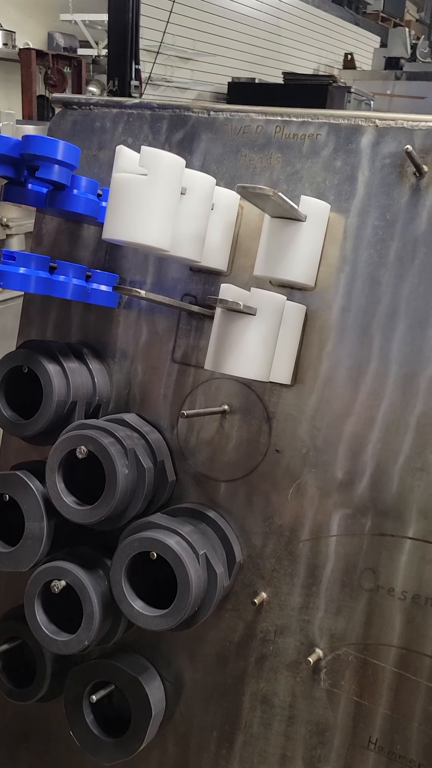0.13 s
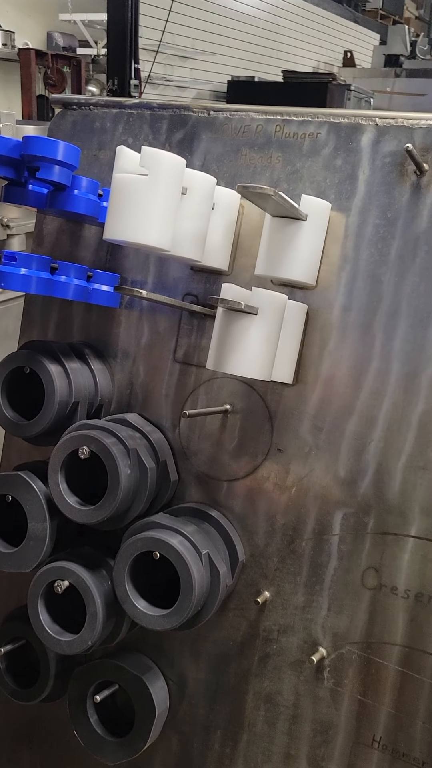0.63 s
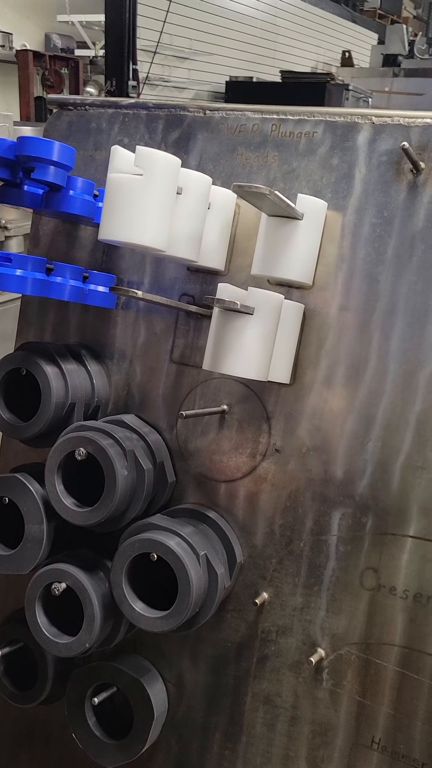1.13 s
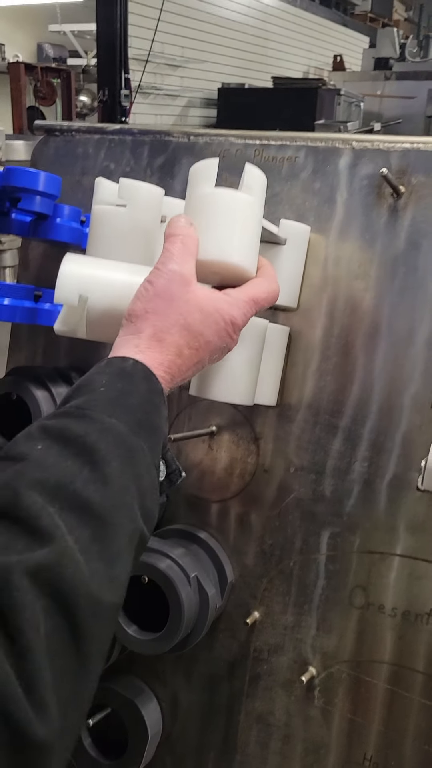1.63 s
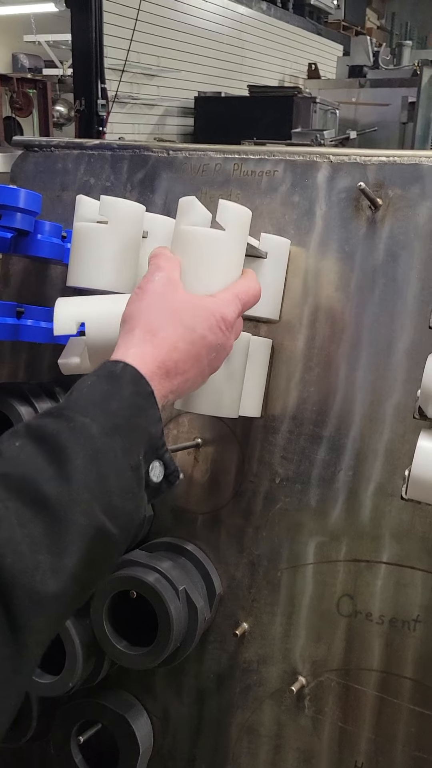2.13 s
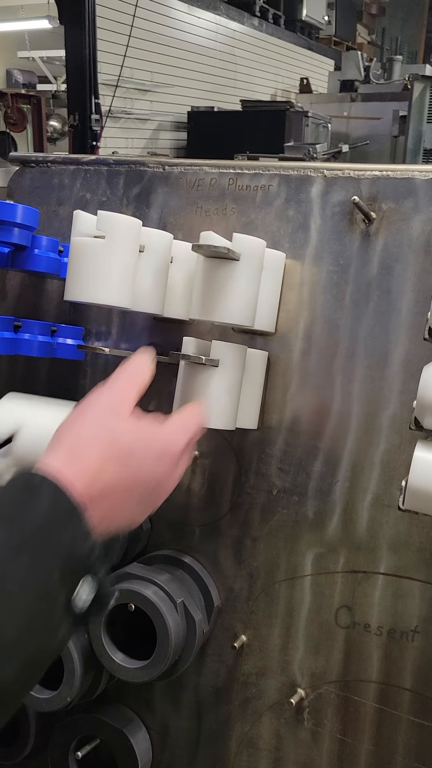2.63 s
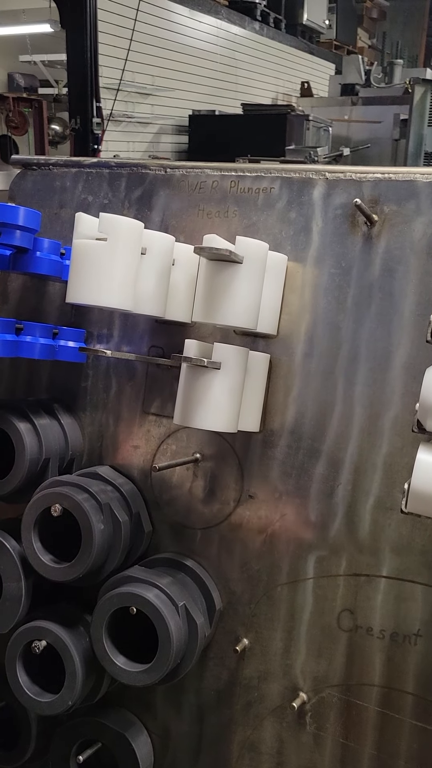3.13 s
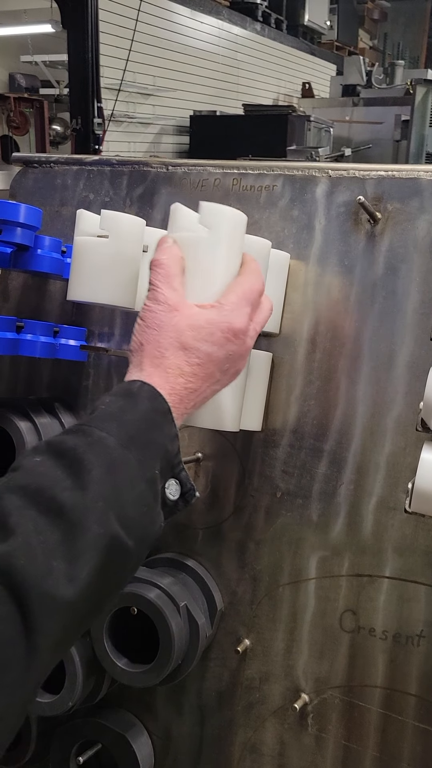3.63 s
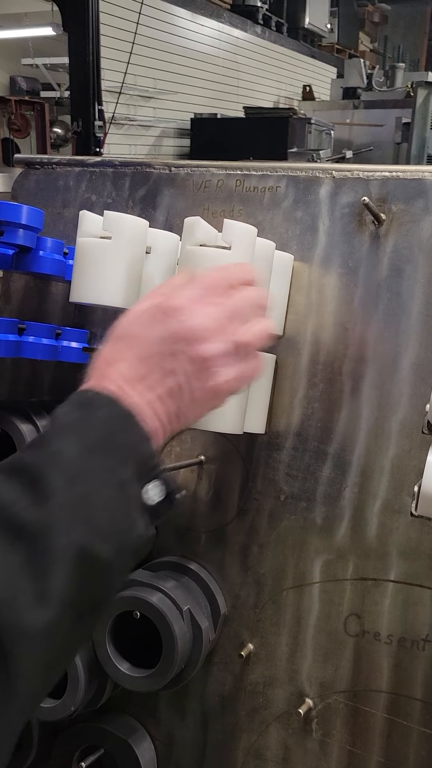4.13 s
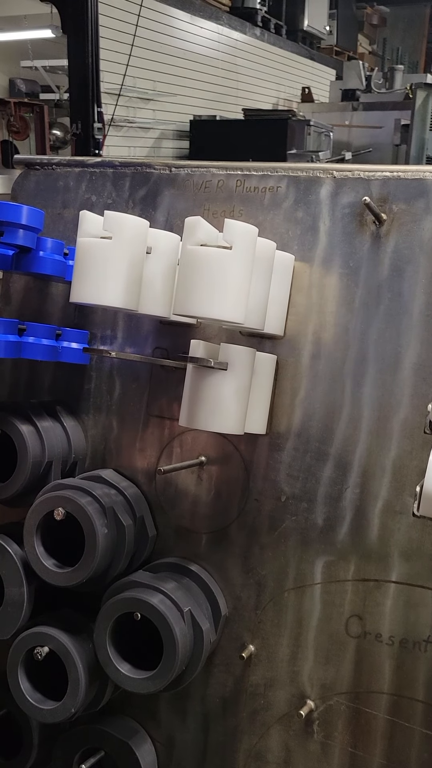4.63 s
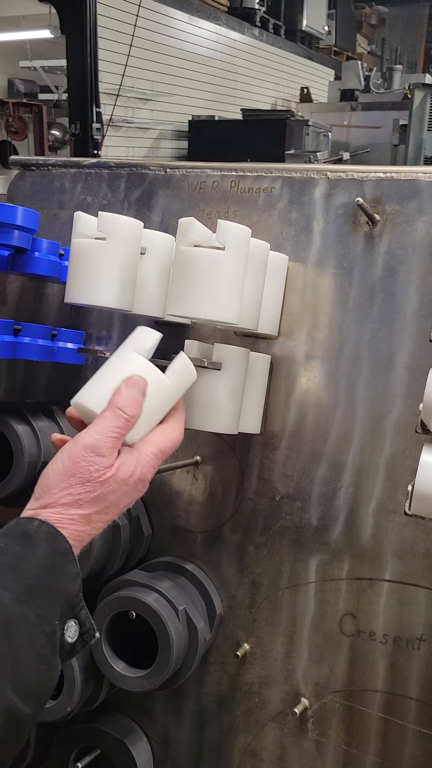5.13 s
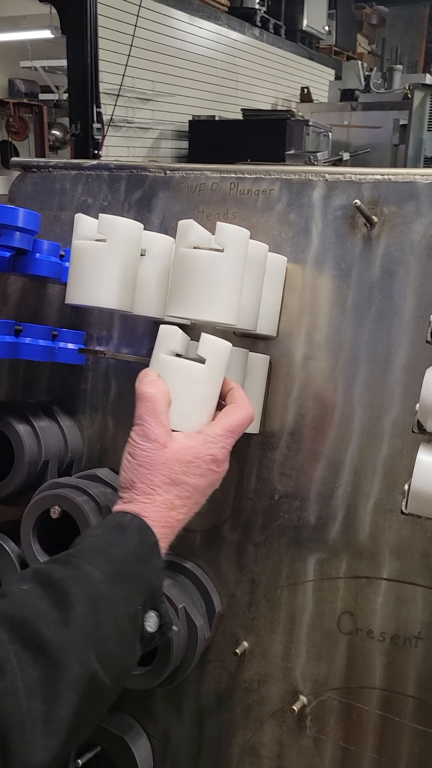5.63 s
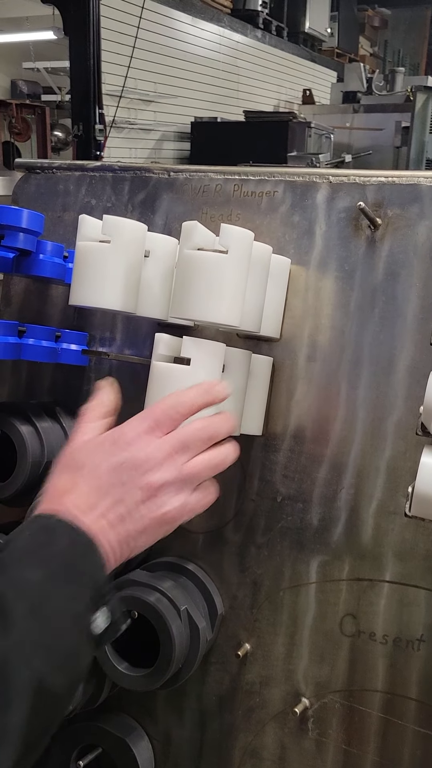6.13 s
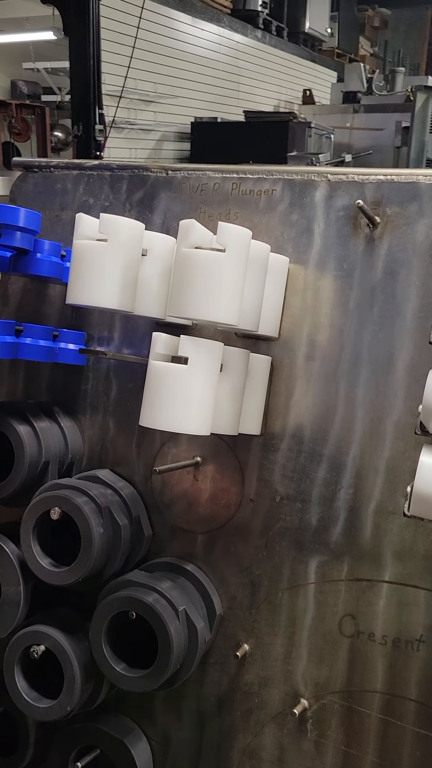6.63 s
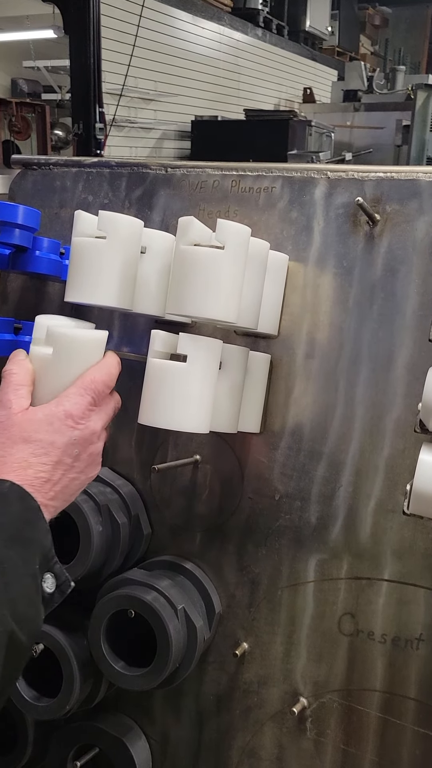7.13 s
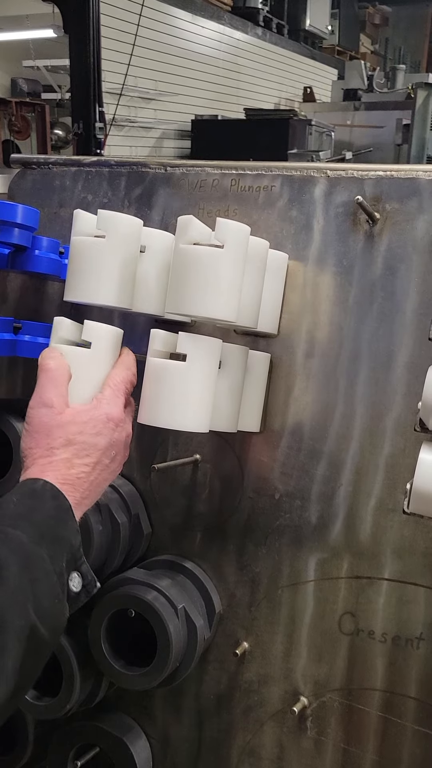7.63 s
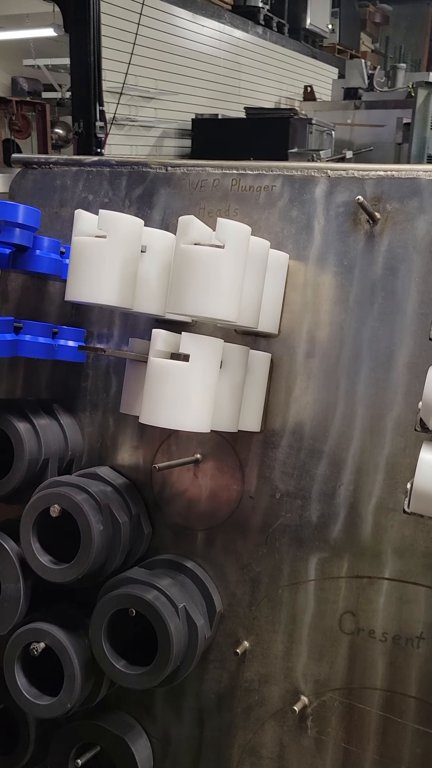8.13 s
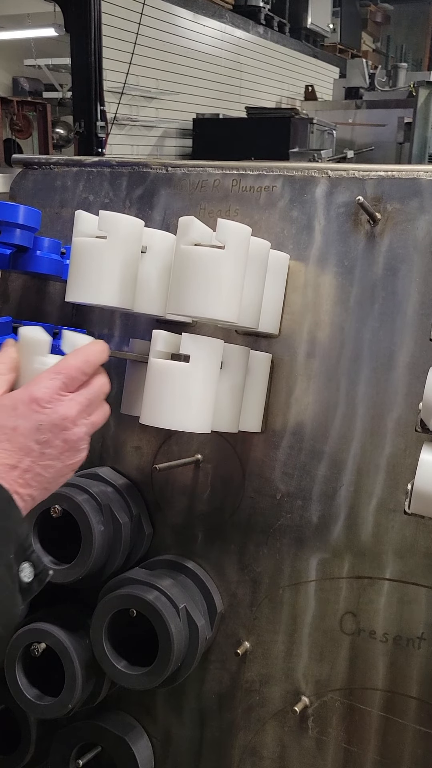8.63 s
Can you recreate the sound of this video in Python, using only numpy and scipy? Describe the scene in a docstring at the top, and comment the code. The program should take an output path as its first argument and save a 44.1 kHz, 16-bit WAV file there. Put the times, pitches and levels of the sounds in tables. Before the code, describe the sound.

For the first 1.7 seconds there is only a factory hall: soft broad fan noise, low wavering hum, faint distant ticks and a tiny tap near 0.5. At 1.7 a hard plastic part knocks the steel top with a quick double thud; small rattles and a light slide follow from 2.0 to 2.5, then a loud bright clack at 2.7 with a short ring. Quiet until 3.7, when another part knocks, scrapes and clatters through 4.1, ending in a strong clack with ringing steel. A lull follows. From 5.55 come several duller knocks, a gritty rub at 5.8 and a firm, lower clack at 6.0. After another pause, a sharp knock at 7.2, then bumps and sliding from 7.35 to 7.9, and the loudest booming clack at 8.0. A faint rub at 8.4, then hum. Close, stereo, short hall tail.

```python
"""First one hears fan noise, mains hum and faint far ticks in a factory hall, by two microphones 0.27 m apart.
Then hard plastic parts are set down on a cart's sheet-steel top, knocking the steel and each other.
Each blow clacks in the part (dying sines rung by contact clicks), booms in the sheet and dies away in the hall
(fading noise); between blows parts slide and rub (shaped noise), and some blows leave steel ringing.
Fans and far machines are slowly drifting noise; the hum is wavering sines."""
import sys
import numpy as np
from scipy import signal
from scipy.fft import rfft, irfft
from scipy.io import wavfile
from scipy.ndimage import uniform_filter1d

SR = 44100
rng = np.random.default_rng(int(sys.argv[2]) if len(sys.argv) > 2 else 0)


def to_linear_factor(level_db):
    """Convert decibel levels (scalar or array-like) to linear amplitude factors."""
    exponent = np.asarray(level_db, float) / 20
    return 10 ** exponent


def bounce(signal):
    """Save signal as a 16-bit WAV file at the path given by the first command-line argument."""
    frames = np.transpose(np.atleast_2d(signal))
    limited = np.clip(frames, -1, 1)
    pcm = np.round(limited * 32767).astype(np.int16)
    wavfile.write(sys.argv[1], SR, pcm)


N = 385875  # samples: 8.75 s


def evened(x):
    """Scales to rms 1."""
    return x / np.sqrt(np.mean(x ** 2) + 1e-20)


def read(points, hz, column=1):
    """Reads a table on a log-frequency axis."""
    table = np.transpose(points)
    return np.interp(np.log(hz + 1), np.log(table[0] + 1), table[column])


def add(mix, s, sound):
    """Mixes a stereo sound in at time s."""
    part = mix[:, round(s * SR):][:, :sound.shape[1]]
    part += sound[:, :part.shape[1]]


def bands(x, edges_hz):
    """Splits causally into bands at the given edges."""
    cuts = [(edges_hz[0], "low")]
    cuts += [(pair, "band") for pair in zip(edges_hz, edges_hz[1:])]
    cuts += [(edges_hz[-1], "high")]
    return [signal.sosfilt(signal.butter(3, hz, kind, fs=SR, output="sos"), x) for hz, kind in cuts]


SPACING_M = 0.27  # between the two microphones
BASS_SAME = 0.97  # likeness of the two microphones in the bass, 0-1


def diffuse(count, spectrum, colour=np.ones_like):
    """Noise from all sides, rms 1: two spaced microphones agree in the bass only."""
    hz = np.fft.rfftfreq(count, 1 / SR)
    a, b = rfft(rng.standard_normal((2, count)))
    same = np.clip(BASS_SAME * np.sinc(2 * hz * SPACING_M / 343), -1, 1)  # 343 m/s: speed of sound
    pair = np.array([a, same * a + np.sqrt(1 - same ** 2) * b])
    return evened(irfft(pair * to_linear_factor(read(spectrum, hz)) * colour(hz), count))


def modes(table, t, spread_db, unlike, beat_hz=0, detune=0):
    """Dying sines of random strength and load; phase differs between microphones; close pairs beat."""
    hz, db, t60 = np.transpose(table)[:, :, None]
    size, side, pair, load = rng.standard_normal((4, len(table), 1))
    shift = unlike * side * np.minimum(hz / 600, 1.5)
    beat = 1 + 0.63 * np.sin(2 * np.pi * beat_hz * (1 + pair / 2) * t)
    envelope = to_linear_factor(db + spread_db * size - 60 * t / t60) * beat
    phase = 2 * np.pi * hz * (1 + detune * load) * t
    return np.array([(envelope * np.sin(phase + k * shift)).sum(0) for k in (.5, -.5)])


# broad bands where the modes of steel and parts crowd together:
# (centre [Hz], width [Hz], usual gain [dB])
CROWDED_BANDS = [(205, 30, 6), (370, 60, 5), (480, 40, 4), (770, 70, 5), (1000, 80, 5), (1250, 120, 7),
                 (1950, 120, 6), (2200, 140, 7), (2750, 180, 7), (3100, 130, 6), (3500, 130, 5),
                 (4250, 170, 5), (4600, 130, 5), (5450, 220, 6), (7850, 280, 7)]


def crowding(hz):
    """Gain of the crowded bands; each call stirs them a little differently."""
    centre_hz, width, db = np.transpose(CROWDED_BANDS)[:, :, None]
    stirred = 1 + 0.45 * rng.standard_normal((len(CROWDED_BANDS), 1))
    return to_linear_factor((db * stirred * np.exp(-2 * ((hz - centre_hz) / width) ** 2)).sum(0))


# parts set down on the cart or knocked together: (time [s], boom level [dB], boom pitch [Hz],
# knock over boom [dB], hardness as clack over boom [dB], chatter of the contact [ms])
PART_BLOWS = [(1.701, -25, 317, -5, -14.5, 1.3), (1.72, -27.5, 357, -8, -9, 4.8),
              (2.27, -48.5, 254, -11, -33, 3.1), (2.299, -32.5, 333, 0, -6, 13),
              (2.311, -53.5, 270, -6, -6.5, .8), (2.335, -37.5, 260, -1, -3, 3.2),
              (2.361, -50, 290, -3, -20.5, 4.3), (2.42, -48.5, 316, 2, 2.5, 4.8),
              (2.491, -47.5, 290, -13, -38, 11), (2.709, -17.5, 385, 3.5, 4, 1.8),
              (3.688, -39.5, 350, 9, 8, 7.9), (3.698, -24, 350, -5.5, -20, 2.1),
              (3.846, -25.5, 356, 4, -4, 1.4), (3.968, -32.5, 332, -6, 0, 1.4),
              (4.059, -40, 362, 2.5, -1, 8.2), (4.084, -19, 316, 4, 6, 8.3),
              (5.559, -25, 253, -6, -10, 1.1), (5.613, -37.5, 260, -4.5, -13, 1.4),
              (5.641, -26, 274, -10, -21, 0.83), (5.809, -25.5, 225, 0, -11, 0.67),
              (5.96, -42.5, 209, 4.5, 1, 5.1), (5.989, -18.5, 194, 2, 1.5, 0.56),
              (7.173, -19, 337, -1.5, -6.5, 6), (7.358, -26.5, 340, -10.5, -24, 4.3),
              (7.581, -29.5, 227, -3, -13, 0.98), (7.609, -39, 378, -9, -37, 3.7),
              (7.75, -25, 220, 6, 1.5, 19.4), (7.76, -27, 236, -6.5, 10, 5.3),
              (7.934, -37, 235, -18, -21, 2.7), (8.014, -13.5, 315, -1.5, -3.5, 5.2),
              (8.03, -26, 136, 7, 9, 7.8)]
# edges between boom, knock, clack, treble and topmost sizzle: (frequency [Hz])
BLOW_BAND_EDGES = (500, 1500, 4000, 6800)
CLACK_HZ, OCTAVE_DB = 3250, 15  # upper edge of the clack; it drops an octave for so much less hardness
TREBLE_DB, TREBLE_SHARE = -20.5, 0.86  # the treble follows the hardness almost fully
TOP_DB, TOP_SHARE = -31, 1.35  # the topmost sizzle rises steeply with hardness
SHARP_SHARE = 0.83  # further treble and sizzle per dB of hardness above 0


def blow(boom_db, boom_hz, knock_db, hard_db, chatter_ms):
    """A contact rings the part; sheet and hall fill up for as long as the contact chatters."""
    t = np.arange(SR * 3 // 5) / SR
    chatter = max(chatter_ms, 0.1) / 1000
    part = struck_part(t, boom_hz, hard_db, chatter)
    fill = 1 - np.exp(-t / (0.00072 + chatter))
    body = part + (sheet(t) + wash(t)) * fill
    # nothing radiates far below the boom
    body = signal.sosfilt(signal.butter(3, 0.28 * boom_hz, "high", fs=SR, output="sos"), body)
    split = bands(body, BLOW_BAND_EDGES)

    # the struck patch favours its own pitch
    dull = signal.sosfilt(signal.butter(2, 2.1 * boom_hz, fs=SR, output="sos"), split[0])
    peak = signal.lfilter(*signal.iirpeak(boom_hz, 1.1, SR), split[0])
    split[0] = 0.42 * dull + peak

    clack_edge = np.clip(CLACK_HZ * 2 ** (hard_db / OCTAVE_DB), 2200, 9000)
    split[2] = signal.sosfilt(signal.butter(4, clack_edge, fs=SR, output="sos"), split[2])

    sharp_db = SHARP_SHARE * max(hard_db, 0)
    treble_db = TREBLE_DB + TREBLE_SHARE * hard_db + sharp_db
    top_db = TOP_DB + TOP_SHARE * hard_db + sharp_db
    lifts_db = (0, knock_db, hard_db, treble_db, top_db)
    # each band is levelled by its first 900 samples (20 ms)
    return sum(to_linear_factor(boom_db + db) * band / band[:, :900].std() for band, db in zip(split, lifts_db))


# modes of the plastic part: (frequency [Hz], relative level [dB], t60 [s])
PART_MODES = [(750, 9, 0.018), (1160, 3, 0.015), (2060, 18, 0.0054), (2850, 11.5, 0.0045),
              (4660, -15, 0.01)]
PART_DB, PART_SHARE = 0, 0.91  # level of the part; harder blows ring it more, dB per dB
THUD_DB, THUD_T60 = 6.5, 0.024  # the sheet bows once under the blow; t60 in s
LEAD = 7  # samples by which the left microphone hears part and thud first
DETUNE = 0.02  # spread of mode pitch under load, as a share of it; sheet and part alike


def struck_part(t, boom_hz, hard_db, chatter):
    """A burst of contact clicks excites the part's short modes, with one thud of the sheet below."""
    clicks = rng.standard_normal(2000) * (rng.random(2000) < 0.03) * np.exp(-t[:2000] / chatter)
    clicks[0] = 2.5  # first touch
    clicks = clicks[None] / np.linalg.norm(clicks)
    part = to_linear_factor(PART_DB) * modes(PART_MODES, t, spread_db=2.5, unlike=0.3, detune=DETUNE)
    part = part * (1 - np.exp(-t / (0.0004 + chatter / 8)))
    part = signal.fftconvolve(part, clicks, axes=1)[:, :len(t)]
    part = to_linear_factor(PART_SHARE * min(hard_db, 4)) * part
    thud = modes([(boom_hz, THUD_DB, THUD_T60)], t, spread_db=1, unlike=0.14)
    part = part + thud * (1 - np.exp(-t / (0.00041 + chatter / 8)))
    part[1] = np.roll(part[1], LEAD)
    return part


# modes of the cart's sheet-steel top: (frequency [Hz], relative level [dB], t60 [s])
SHEET_MODES = [(201.3, -19, 0.52), (290, -31.5, 0.16), (397, -14, 0.1235), (445, 6, 0.16), (504, -12, 0.16),
               (551.3, 9.5, 0.11), (683.4, 11.5, 0.077), (842, 6, 0.31), (926, -7.5, 1), (1066, -13, 0.37),
               (1140, 10, 0.25), (1190, -31, 0.77), (1390, 8.5, 0.29), (1752, -7.5, 0.26),
               (1820, -11.5, 0.69), (1983, -9, 0.17), (2240, 5, 0.11), (2700, -29.5, 0.53),
               (2700, -27, 0.29), (2840, -11, 0.55), (3770, -13.5, 0.5)]


def sheet(t):
    """The steel top rings in beating modes, wide enough to differ between the microphones."""
    return to_linear_factor(-19) * modes(SHEET_MODES, t, spread_db=3, unlike=1.5, beat_hz=18, detune=DETUNE)


# dense ring of cart and hall: (frequency [Hz], relative density [dB per Hz])
WASH_SPECTRUM = [(35, -47), (60, -8.5), (170, -2), (330, -10), (520, -6.5), (920, -1), (1570, -7),
                 (2000, -18), (3300, -19), (3700, -26.5), (6000, -32.5), (9000, -39), (10000, -48),
                 (15800, -47)]
# how the ring dies: (frequency [Hz], cart t60 [s], hall t60 [s])
WASH_DECAY = [(78.8, 0.081, 0.62), (260, 0.094, 0.48), (715, 0.069, 0.57), (1840, 0.12, 0.68),
              (4800, 0.095, 0.72), (12030, 0.19, 0.44)]
CART_DB, HALL_DB = 3.5, -8


def wash(t):
    """Cart and hall ring in modes too dense to tell apart: noise dying at two rates per frequency."""
    hz, when, z = signal.stft(diffuse(len(t), WASH_SPECTRUM, crowding), SR, nperseg=256)
    cart = to_linear_factor(CART_DB - 60 * when / read(WASH_DECAY, hz, column=1)[:, None])
    hall = to_linear_factor(HALL_DB - 60 * when / read(WASH_DECAY, hz, column=2)[:, None])
    return signal.istft(z * (cart + hall), SR, nperseg=256)[1][:, :len(t)]


# light taps on the cart: (time [s], boom level [dB], knock over boom [dB], hardness [dB])
LIGHT_TAPS = [(0.545, -54, -9, -14), (3.119, -68.5, 19.5, 15), (3.149, -55.5, 5.5, 6),
              (4.481, -62, 12.5, 5), (6.677, -59, 6, 3.5)]


def tap(boom_db, knock_db, hard_db):
    """A faint blow with one usual pitch (297 Hz) and a brief contact (0.45 ms)."""
    return blow(boom_db, 297, knock_db, hard_db, 0.45)


# steel tongues and corners left ringing by some blows:
# (time [s], frequency [Hz], level before swell and beat [dB], t60 [s])
STEEL_RINGS = [(1.703, 2700, -53, 0.49), (1.703, 4570, -64, .4), (5.561, 5500, -62, .3),
               (2.709, 4240, -43.5, 0.61), (4.084, 201, -26, 0.52), (4.084, 1922, -39, 0.79),
               (4.084, 2950, -37.5, 0.63), (7.173, 200.5, -35.5, 1), (8.014, 1864, -39, 1)]


def ring(hz, db, t60):
    """One mode of the steel, swelling in after the blow and beating slowly, kept for 0.6 s."""
    t = np.arange(SR * 3 // 5) / SR
    swell = 1 - np.exp(-t / 0.015)
    return modes([(hz, db, t60)], t, spread_db=0, unlike=0.5, beat_hz=9) * swell


# a slot rubbing over a metal tongue: (time [s], length [s], cut at 0.24 s if longer,
# lower band before shaping [dB], lower band [Hz], upper band [Hz])
SLOT_RUBS = [(2.578, 0.17, -60.5, 2700, 5160), (3.967, 0.039, -32.5, 2180, 4800),
             (4.053, 0.02, -42, 1160, 4330), (5.808, 0.053, -29.5, 1156, 2000),
             (5.958, 0.037, -42, 2080, 2700), (7.709, .05, -53, 2060, 2920), (7.804, 0.43, -51, 2700, 4600),
             (7.788, 0.39, -52.5, 5230, 7850), (8.406, 0.027, -43, 1870, 2540)]
RUB_WIDTH, RUB_UPPER_DB = 0.06, -12  # width as a share of the pitch; the upper band under the lower


def rub(length, db, lower_hz, upper_hz):
    """The slot sings: gritty noise through two narrow, steep bands, quick to start."""
    grit = rng.standard_normal((2, SR // 4)) * rng.exponential(1, SR // 4)
    grit = grit + 0.31 * grit[::-1]  # each microphone also hears some of the other's noise
    out = 0
    for hz, gain_db in ((lower_hz, db), (upper_hz, db + RUB_UPPER_DB)):
        edges_hz = hz * (1 + RUB_WIDTH * np.array([-0.5, 0.5]))
        sos = signal.butter(2, edges_hz, "band", fs=SR, output="sos")
        out = out + to_linear_factor(gain_db) * evened(signal.sosfilt(sos, grit))
    t = np.arange(0, min(length, 0.24), 1 / SR) / length
    return out[:, :len(t)] * np.sin(np.pi * t ** 0.3)


# a part sliding on the steel: (time [s], length [s], top level before grit and brightness [dB],
# place of the top [0-1, held within 0.05-0.95], brightness [dB per octave])
PART_SLIDES = [(2.029, 0.63, -51.5, 0, 2.5), (2.259, 0.33, -42, 0.4, -5), (2.653, 0.043, -45, 0.2, 5.5),
               (3.846, 0.19, -34.5, 0.2, 1), (4.005, 0.23, -37, 0.6, 1.5), (5.749, 0.27, -37.5, 0.57, 4),
               (5.825, 0.31, -50, 1, 2), (7.365, 0.059, -28, .3, -12), (7.512, 0.17, -40, 1, -3),
               (7.651, 0.18, -38, 0.4, 1), (7.8, 0.2, -36, 0.6, 0.5), (7.896, 0.23, -37, 0.7, 5)]
# colour of the friction: (frequency [Hz], relative density [dB per Hz])
SCRAPE_SPECTRUM = [(50, -52), (90, -38.5), (200, -10), (337, 5), (700, -11), (1100, -13.5), (2400, -21.5),
                   (3400, -31.5), (6000, -40.5), (15800, -60)]


def slide(length, top_db, place, bright_db):
    """Slightly gritty friction noise that swells to the top of the stroke and fades."""
    t = np.arange(0, length, 1 / SR) / length
    place = np.clip(place, 0.05, 0.95)
    away = np.where(t < place, 1 - t / place, (t - place) / (1 - place))
    swell_db = -14.5 * away ** 1.18
    slow = signal.oaconvolve(rng.standard_normal(SR), np.hanning(600), "same")
    grit = to_linear_factor(3 * evened(slow))  # 3 dB of unevenness
    soft = signal.windows.tukey(len(t), 400 / len(t))  # softened ends

    def colour(hz):
        """Crowded bands, tilted by the brightness."""
        return crowding(hz) * to_linear_factor(bright_db * np.log2(1 + hz / 500))

    noise = diffuse(SR, SCRAPE_SPECTRUM, colour)[:, :len(t)]
    return noise * grit[:len(t)] * to_linear_factor(top_db + swell_db) * soft


# the clearest far ticks and rustles: (time [s], middle level [dB], treble level [dB],
# top level [dB], time to fall about 17 dB [ms])
FAR_TICKS = [(0.039, -52, -75, -102, 53), (0.255, -56, -61, -84, 55), (0.283, -50.5, -56.5, -101, 16),
             (0.461, -59.5, -60.5, -89, 13), (0.562, -66, -58.5, -70, 1.5), (0.582, -55, -72, -78, 61),
             (0.851, -58, -68, -87, 30), (1.031, -67, -66, -80, 25), (1.2, -53, -72, -85, 40),
             (2.162, -74, -67, -89.5, 13), (2.23, -58.5, -69, -81, 26), (2.895, -48, -54.5, -80, 7.6),
             (3.028, -72, -64, -70.5, 11), (3.137, -73, -101, -58.5, 17), (3.369, -70, -69, -83, 17),
             (6.665, -73, -61.5, -67, 23)]


def tick(middle_db, treble_db, top_db, length_ms):
    """A short puff of noise from far off, levelled in three bands."""
    t = np.arange(6000) * 1000 / SR / max(length_ms, 1)
    noise = diffuse(len(t), [(500, 0), (4000, -6), (8000, -4), (15000, -6)], crowding)
    split = bands(noise, (1500, 4000, 9000))[1:]
    shape = (1 - np.exp(-t * 8)) * to_linear_factor(-17 * t ** 0.7)
    shape = shape / np.sqrt(np.mean(shape[:900] ** 2))
    return shape * sum(to_linear_factor(db) * evened(band) for band, db in zip(split, (middle_db, treble_db, top_db)))


# mains hum: (frequency [Hz], nominal rms level [dB])
HUM_TONES = [(119.8, -57.5), (240, -67.5), (360, -69.5)]
# fan bands: (centre [Hz], width [Hz], nominal rms level [dB])
FAN_BANDS = [(751, 65, -64.5), (1098, 19, -71), (2097, 98, -73.5), (6170, 250, -80)]


def hum():
    """Mains hum that wavers a little, and narrow fan bands of noise."""
    t = np.arange(N) / SR
    out = np.zeros((2, N))
    for hz, db in HUM_TONES:
        waver = 1 + 0.031 * evened(uniform_filter1d(rng.standard_normal(N), 5000))
        out += to_linear_factor(db) * np.sqrt(2) * waver * np.sin(2 * np.pi * (hz * t + rng.random()))
    for hz, width, db in FAN_BANDS:
        sos = signal.butter(1, (hz - width / 2, hz + width / 2), "band", fs=SR, output="sos")
        out += to_linear_factor(db) * evened(signal.sosfilt(sos, rng.standard_normal((2, N))))
    return out


# fans and machines far off in the hall: (frequency [Hz], relative density [dB per Hz])
AIR_SPECTRUM = [(12, -20), (25, -26), (55, -5.5), (90, -7), (200, -9.5), (450, -13), (1000, -14.5),
                (2200, -20), (4000, -28), (5300, -35), (8200, -35.5), (9200, -70), (15500, -71),
                (16000, -69.5)]
# their level before patches and lifts: (time [s], level [dB])
AIR_LEVEL = [(0, -49), (.4, -50.5), (1.6, -53.5), (2.1, -51.5), (3.4, -53.5), (5, -53.5), (6, -51.5),
             (7.5, -55.5), (8.75, -54.5)]
# lift of the treble, from about 1.2 kHz: (time [s], lift [dB])
TREBLE_LIFT = [(0, -1.7), (.5, -5), (1.3, -1), (1.7, -5.5), (3, 1), (5.3, -4), (8.75, -1)]
# lift of the topmost hiss, from about 8.3 kHz: (time [s], lift [dB])
HISS_LIFT = [(0, 2), (.4, -10), (1, 21.5), (1.999, 9), (2.4, 21), (3.6, 27), (4, -2), (4.5, 23), (5, 21),
             (5.4, 5), (6, 29), (6.6, 20.5), (7.6, 23), (8.1, 23), (8.75, 24.5)]


def air():
    """Far machinery: noise with drifting patches, changing in level and treble brightness. Apart from it, above
    about 8.3 kHz a thin topmost hiss comes and goes."""
    hz, t, z = signal.stft(diffuse(N, AIR_SPECTRUM), SR, nperseg=1024)
    patches = uniform_filter1d(rng.standard_normal(z.shape[1:]), 14, 0)
    patches = evened(uniform_filter1d(patches, 8, 1))
    level_db = np.interp(t, *np.transpose(AIR_LEVEL))
    treble_db = np.interp(t, *np.transpose(TREBLE_LIFT))
    top_db = np.interp(t, *np.transpose(HISS_LIFT))
    top = np.clip((hz - 8300) / 1000, 0, 1)[:, None]
    treble = np.clip(np.log2(hz / 1200 + 1e-9) / 0.5, 0, 1)[:, None] - top
    z = z * to_linear_factor(1.5 * patches + level_db + treble * treble_db + top * top_db)
    return signal.istft(z, SR, nperseg=1024)[1][:, :N]


# colour of the left microphone over the right: (frequency [Hz], left over right [dB])
MICROPHONE_BALANCE = [(60, -4.5), (170, -1.5), (500, 0.5), (1400, -2), (2800, -0.5), (6000, 3),
                      (12000, 0.5)]


def microphones(dry):
    """The two microphones differ a little in colour, half the difference on each."""
    tilt_db = read(MICROPHONE_BALANCE, np.fft.rfftfreq(N, 1 / SR)) / 2
    return irfft(rfft(dry) * to_linear_factor(np.array([tilt_db, -tilt_db])), N)


def scene():
    """All sources over the hall's floor of noise."""
    left_over_right_db = -0.5  # the machines stand a little to the right
    mix = (air() + hum()) * to_linear_factor(np.array([[left_over_right_db], [-left_over_right_db]]) / 2)
    for table, play in ((PART_BLOWS, blow), (LIGHT_TAPS, tap), (STEEL_RINGS, ring),
                        (SLOT_RUBS, rub), (PART_SLIDES, slide), (FAR_TICKS, tick)):
        for s, *row in table:
            add(mix, s, play(*row))
    return mix


def band_limit(x):
    """A steep low-pass at the top of the band."""
    return signal.sosfilt(signal.butter(12, 15990, fs=SR, output="sos"), x)


def record(dry):
    """The spaced microphones hear the scene; peaks bend softly at full scale."""
    heard = microphones(dry)
    bent = heard / (1 + heard ** 6) ** (1 / 6)
    return band_limit(bent)


dry = scene()
out = record(dry)
bounce(out)
```